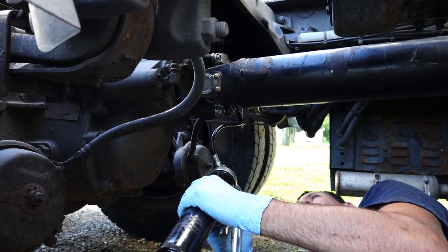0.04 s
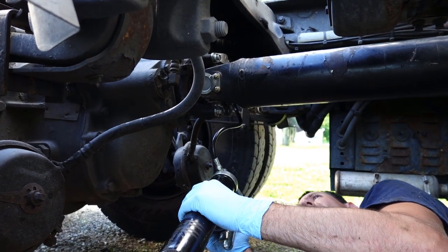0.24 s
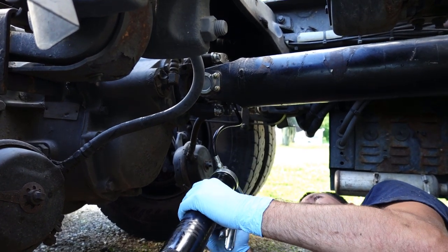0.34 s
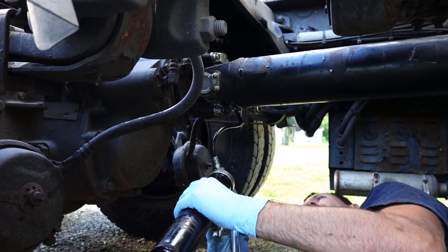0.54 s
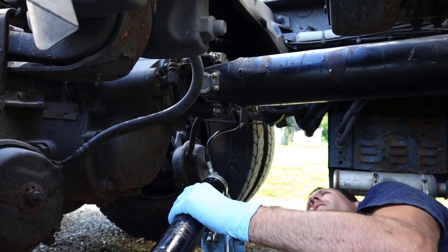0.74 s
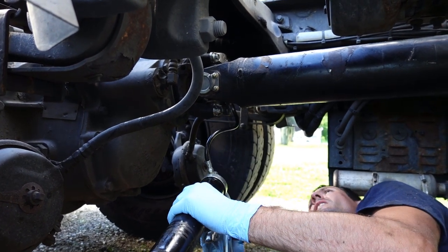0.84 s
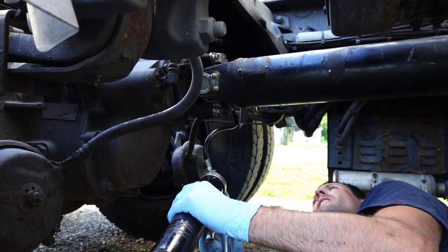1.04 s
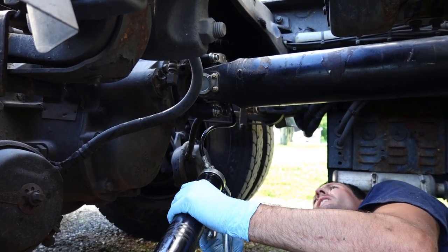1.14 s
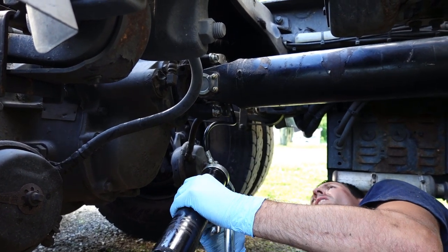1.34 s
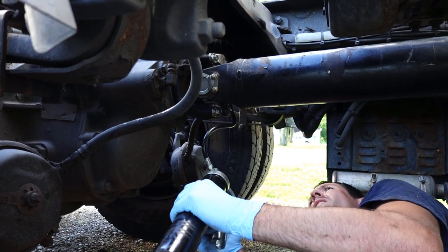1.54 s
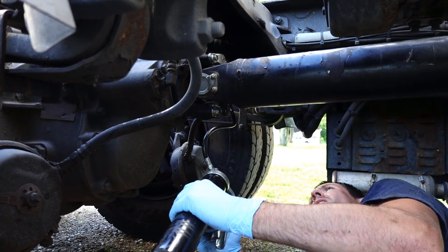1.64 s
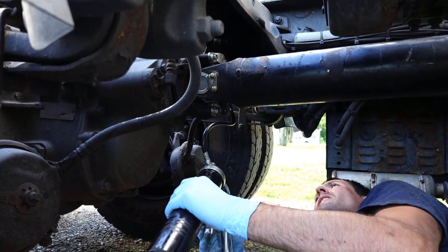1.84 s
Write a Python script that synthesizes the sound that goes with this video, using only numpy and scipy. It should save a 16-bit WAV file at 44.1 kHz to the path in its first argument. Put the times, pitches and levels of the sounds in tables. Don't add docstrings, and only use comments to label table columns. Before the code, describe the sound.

A lever grease gun clacks sharply under a truck, metal chattering and scraping over a low engine drone

```python
import sys
import numpy as np
from scipy import signal
from scipy.fft import rfft, irfft
from scipy.io import wavfile
from scipy.ndimage import uniform_filter1d

SR = 44100
rng = np.random.default_rng(int(sys.argv[2]) if len(sys.argv) > 2 else 0)


def inscribe(sig):
    pcm = np.round(np.clip(np.atleast_2d(sig).T, -1, 1) * 32767)
    wavfile.write(sys.argv[1], SR, pcm.astype(np.int16))


def level_to_linear(level):
    exponent = np.asarray(level, float) / 20
    return 10 ** exponent


N = 83790
T = np.arange(N) / SR


def unit(x):
    return x / np.sqrt(np.mean(x ** 2))


def curve(rows):
    return np.interp(T, *np.array(rows, float).T)


def walk(rate_hz):
    k = int(SR / rate_hz)
    smooth = uniform_filter1d(rng.standard_normal(N), k)
    return unit(uniform_filter1d(smooth, k))


def ring(x, hz, width_hz):
    return signal.lfilter(*signal.iirpeak(hz, hz / width_hz, fs=SR), x)


def shaped(points, flicker_db, rate_hz):
    f = np.fft.rfftfreq(N, 1 / SR) + 1
    p = np.array(points, float)
    colour = level_to_linear(np.interp(np.log(f), np.log(p[:, 0]), p[:, 1]))
    spectrum = rfft(rng.standard_normal(N)) * colour
    octave = np.clip(np.log2(f / 40), 0, 8)
    out = np.zeros(N)
    for k in range(9):
        weight = np.clip(1 - abs(octave - k), 0, 1)
        out += irfft(spectrum * weight, N) * level_to_linear(flicker_db * walk(rate_hz))
    return unit(out)


def echo_tail(t, t60_s):
    return rng.standard_normal(len(t)) * 1000. ** (-t / t60_s)


def add_echo(x, tail, db):
    return x + level_to_linear(db) * signal.fftconvolve(x, tail / np.sqrt(np.sum(tail ** 2)))[:N]


def contact(t, decay_s, rise_s):
    grit_db, crack, crack_s = 1.5, 40., .008
    grit = rng.standard_normal(len(t)) * level_to_linear(grit_db * rng.exponential(size=len(t)))
    push = grit * (1 - np.exp(-t / max(rise_s, 3e-5))) * 1000. ** (-t / max(decay_s, 1e-3))
    push[0] += crack * max(1 - decay_s / crack_s, 0)
    return push


def body(push, modes):
    jitter, scatter_db, damping = .012, 2., .033
    chance = rng.standard_normal((len(modes), 2))
    out = 0
    for (hz, width_hz, db), (shift, lift) in zip(modes, chance):
        mode = ring(push, hz * (1 + jitter * shift), width_hz + damping * hz)
        out = out + level_to_linear(db + scatter_db * lift) * mode
    return out


def strikes(rows, modes, bare_db, spread, order):
    out, t = np.zeros(N + SR), np.arange(SR // 6) / SR
    low_cut_order, high_cut_order = order
    for at, db, hz, decay_s, rise_s in rows:
        push = contact(t, decay_s, rise_s)
        hit = unit(body(push, modes)) + level_to_linear(bare_db) * unit(push)
        low_cut = signal.butter(low_cut_order, hz / spread, "high", fs=SR, output="sos")
        hit = signal.sosfilt(low_cut, hit)
        hit = signal.lfilter(*signal.butter(high_cut_order, min(hz * spread / 2, .4 * SR), fs=SR), hit)
        loudest = np.sqrt(uniform_filter1d(hit ** 2, size=100).max())
        i = int(at * SR)
        out[i:i + len(t)] += hit * level_to_linear(db) / loudest
    return out[:N]


# start in seconds, level in dB, colour in Hz,
# contact decay in seconds, contact rise in seconds.
BARREL_HITS = [(.2663, -41.5, 1280, 0.0062, 0.000048), (.2668, -42, 590, 0.01, 0.00041),
               (.4828, -47, 6000, 0.022, .002), (.4971, -24, 5500, 0.005, .0001),
               (1.5725, -32, 5460, 0.005, .0001), (1.6052, -25, 5000, 0.005, .0001),
               (.498, -26, 3800, 0.028, .0005), (.528, -45, 1270, 0.032, .003),
               (1.5735, -32, 5600, 0.032, 0.00034), (1.6058, -28.5, 7200, 0.021, 0.00046),
               (1.6062, -31.5, 2160, 0.024, 0.00019)]
# frequency in Hz, width in Hz, level in dB.
BARREL_MODES = [(850, 170, -4), (1110, 300, -3), (1840, 220, -1.5), (3182, 150, -19), (4064, 600, 1),
                (5760, 220, 7), (6607, 400, -1), (7500, 600, -14), (10540, 1200, 3.5)]


def barrel_knocks():
    return strikes(BARREL_HITS, BARREL_MODES, bare_db=-1., spread=2.7, order=(1, 2))


# start in seconds, level in dB, colour in Hz,
# contact decay in seconds, contact rise in seconds.
LEVER_HITS = [(.3281, -44, 9000, 0.013, 0.00017), (.5853, -33, 3030, 0.036, 0.00042),
              (.5880, -17, 4517, 0.014, .0002), (.5898, -20, 5500, .007, .0003),
              (.5965, -30, 5000, 0.01, .0005), (.598, -33.5, 6560, 0.03, .0003),
              (.6015, -25, 4460, 0.015, 0.00055), (.606, -33, 4500, .02, 0.00058),
              (.610, -30, 5200, 0.02, .0008), (.6145, -37, 4110, .025, .001),
              (.6205, -41, 6120, 0.021, .0003), (.625, -38.5, 4000, 0.041, .001),
              (.631, -43, 4500, 0.015, .001), (.639, -38, 5000, 0.013, 0.00023),
              (.6497, -42.5, 5320, 0.019, .0004), (.656, -50, 4450, 0.033, 0.0011),
              (.666, -59.5, 4500, 0.025, 0.0023)]
# frequency in Hz, width in Hz, level in dB.
LEVER_MODES = [(2277, 240, 3), (3470, 33, -34), (4016, 19, 2.5), (4200, 52, 14.5), (4320, 33, 9.5),
               (5000, 500, 4.5), (6100, 110, -1.5), (7050, 150, 3.5), (7200, 250, -5), (9000, 160, -17.5)]


def lever_snaps():
    return strikes(LEVER_HITS, LEVER_MODES, bare_db=-8., spread=5.2, order=(2, 1))


# start
# in seconds, level in dB, colour in Hz, # contact decay in seconds, contact rise in seconds.
GRATES = [(.5885, -47, 13000, 0.065, 0.003), (.195, -55.5, 9000, 0.017, 0.0017),
          (.219, -32.5, 7100, 0.025, 0.0024), (.225, -27, 9000, 0.047, 0.00098),
          (.232, -41, 9000, 0.021, 0.0008), (.230, -41.5, 1410, 0.06, 0.0054),
          (.279, -49, 9000, 0.05, 0.0019), (.3576, -30.5, 9000, 0.054, 0.00018),
          (.372, -43.5, 9000, 0.036, .008), (.4339, -35.5, 12700, 0.045, 0.00072),
          (.5272, -33.5, 5800, 0.022, .0005), (.5315, -34.5, 6550, 0.019, 0.0017),
          (.7452, -70, 12040, .01, 0.00029), (1.49, -68, 8023, 0.031, 0.0016),
          (1.5204, -63, 7850, 0.023, .001), (1.6916, -67, 7940, 0.065, 0.00056),
          (1.774, -69, 6900, 0.014, 0.00051), (1.788, -73, 8000, 0.018, 0.00044),
          (1.81, -68, 6750, 0.019, .0005), (1.858, -62, 3520, 0.027, 0.00036)]
# frequency in Hz, width in Hz, level in dB.
COUPLER_MODES = [(1000, 370, 6), (3340, 140, 0.5), (4930, 540, -5), (6930, 360, 4.5), (9200, 200, -19.5),
                 (10120, 150, 6), (13000, 200, 4.5), (14500, 220, 9)]


def coupler_grates():
    return strikes(GRATES, COUPLER_MODES, bare_db=1., spread=2.7, order=(1, 2))


# start in seconds, level in dB, frequency in Hz, T60 in seconds.
PINGS = [
    (0.2205, -36, 3170, 0.05),
    (0.231, -41, 1070, 0.04),
    (.2663, -38, 2025, 0.012),
    (0.3283, -31, 5380, 0.012),
    (.4975, -31, 1960, 0.035),
    (1.5728, -32, 3070, 0.03),
    (1.6056, -22, 950, 0.018),
    (1.607, -29, 1900, 0.035),
    (1.573, -38, 930, 0.035),
]


def pings():
    out = np.zeros(N)
    for at, db, hz, t60_s in PINGS:
        t = np.clip(T - at, 0, None)
        waver = level_to_linear(2.5 * walk(250)) * np.sin(2 * np.pi * hz * t + .8 * walk(150))
        out += level_to_linear(db) * waver * 1000. ** (-t / t60_s) * (1 - np.exp(-t / 0.00013))
    return out


# start in seconds, level in dB, colour in Hz, decay in seconds.
TICKS = [(0.155, -42, 3720, 0.0087), (.195, -52, 6100, .01), (.281, -40, 5600, 0.012),
         (.303, -48, 3900, 0.017), (.3285, -31.5, 7160, 0.018), (0.3326, -36, 5570, 0.021),
         (0.328, -45, 8900, 0.0092), (0.6842, -45, 4440, 0.021), (0.688, -64, 4700, 0.011),
         (0.685, -68, 8200, .012), (.708, -55.5, 4300, 0.013), (.7448, -54.5, 7000, .006),
         (.776, -70, 5250, .01), (0.807, -65, 6970, .006), (.823, -66.5, 6000, .006),
         (0.8345, -56.5, 5280, 0.012), (.835, -67, 7200, 0.0066), (.847, -56, 5610, 0.0052),
         (.866, -65.5, 5500, 0.0067), (0.87, -63, 7500, 0.0049), (.908, -70, 7860, 0.0042),
         (0.919, -71, 5350, 0.0052), (0.9519, -58.5, 5400, 0.008), (.9915, -66, 2570, .006),
         (1.015, -67, 7100, .03), (1.0335, -61.5, 2830, 0.0093), (1.161, -60.5, 7110, .02),
         (1.172, -59, 7500, 0.018), (1.1902, -52, 1680, 0.004), (1.249, -57.5, 3900, .008),
         (1.419, -59, 3570, 0.0086), (1.445, -63, 4500, 0.0077), (1.5203, -54.5, 850, 0.012),
         (1.521, -49.5, 5800, 0.022), (1.522, -56, 3750, .015), (.524, -48.5, 4000, .02),
         (1.601, -40, 6000, 0.033), (1.6015, -41, 990, 0.033), (1.537, -64, 3700, .01),
         (1.667, -64, 12040, .015), (1.717, -61.5, 5000, .008), (1.828, -62, 4300, 0.011),
         (1.87, -56.5, 6580, 0.022), (1.886, -53, 7500, 0.033)]


def ticks():
    q = 2.4
    out, t = np.zeros(N + SR), np.arange(SR // 20) / SR
    for at, db, hz, decay_s in TICKS:
        hit = rng.standard_normal(len(t)) * 1000. ** (-t / max(decay_s, 1e-3))
        hit = ring(ring(hit, hz, hz / q), hz, 2 * hz / q)
        out[int(at * SR):][:len(t)] += hit * level_to_linear(db) / np.abs(hit).max()
    return out[:N]


# time in seconds, level in dB.
SLIDE = [(0, -64.5), (.15, -52.5), (.21, -55.5), (.26, -63), (.42, -65), (.49, -57), (.56, -62),
         (.72, -79.5), (.86, -81.5), (.9, -92.5), (1.1, -75.5), (1.35, -87), (1.45, -70.5), (1.55, -67),
         (1.68, -83.5), (1.83, -75.5), (1.9, -65.5)]
# frequency in Hz, level in dB per Hz.
SLIDE_COLOUR = [(410, -32.5), (700, -5), (946, 2), (1460, -8), (2020, 0.5), (2880, -10), (4100, 2.5),
                (14000, -24), (16000, -35.5)]


def slide():
    squeak = np.zeros(N)
    for hz in [3600, 3950, 4400, 5300]:
        swell = level_to_linear(1.8 * walk(60)) * walk(600)
        wander = 1 + .03 * walk(30) + 0.012 * walk(390)
        squeak += swell * np.sin(2 * np.pi * np.cumsum(hz * wander) / SR)
    level_db = curve(SLIDE)
    squeak_db = -6 + .5 * (level_db + 60)
    hiss = shaped(SLIDE_COLOUR, flicker_db=4.5, rate_hz=13)
    return (hiss + level_to_linear(squeak_db) * unit(squeak)) * level_to_linear(level_db)


# start in seconds, length in seconds, level in dB, start pitch in Hz, end pitch in Hz.
NOTES = [(1.073, 0.034, -79.5, 5120, 4520), (1.159, 0.022, -70, 4307, 4170),
         (1.165, 0.022, -70.5, 3360, 4650), (1.175, 0.031, -67.5, 5730, 5440),
         (1.198, 0.02, -65, 5200, 4010), (1.189, .015, -67, 3900, 3700), (1.221, 0.031, -67.5, 3560, 3730),
         (1.264, 0.061, -71, 3570, 3620), (1.486, 0.036, -74, 2700, 2480), (1.254, 0.015, -62, 3300, 4320),
         (1.264, 0.026, -61, 4280, 4450), (1.285, 0.019, -69, 4400, 3240)]


def bird():
    out = np.zeros(N)
    for at, length_s, db, hz, end_hz in NOTES:
        u = np.clip((T - at) / length_s, 0, 1)
        pitch = (hz + (end_hz - hz) * u) * (1 + .016 * walk(500))
        out += level_to_linear(db) * np.sin(np.pi * u) * np.sin(2 * np.pi * np.cumsum(pitch) / SR)
    out = out * level_to_linear(-4 + 5 * walk(250))
    tail = echo_tail(np.arange(SR // 5) / SR, t60_s=.1)
    return add_echo(out, tail, db=-5)


def hollow(x):
    t = np.arange(SR // 4) / SR
    tail = echo_tail(t, t60_s=0.098) * (t > .002)
    tail = signal.lfilter(*signal.butter(1, 5000, fs=SR), tail)
    return add_echo(x, tail, db=-14.5)


# time in seconds, firing rate in Hz.
DRONE_HZ = [(0, 132.3), (.5, 136.5), (1.0, 139), (1.5, 141), (1.9, 134.6)]
# multiple of the firing rate, level in dB.
DRONE_LINES = [(1.9, -15.5), (2.8, -18), (3.8, -30.5)]


def drone():
    phase = 2 * np.pi * np.cumsum(curve(DRONE_HZ) + 2.5 * walk(32)) / SR
    lines = [(0.98, 0.012)] + list(DRONE_LINES)
    out = np.zeros(N)
    for multiple, db in lines:
        out += level_to_linear(db + 2.5 * walk(15)) * np.sin(multiple * phase)
    return level_to_linear(-66.5) * out


# frequency in Hz, level in dB per Hz.
YARD = [(25, -40.5), (70, -11.5), (141, -6.5), (256, -21), (531, -26.5), (2500, -44), (7000, -43),
        (12000, -49.5), (15000, -71.5)]
# time in seconds, gain in dB.
GAIN = [(0, 18), (.496, 20), (.51, 15.5), (.588, 14), (.62, 10.5), (.75, 4.5), (1.2, 5.5), (1.6, 7),
        (1.64, 4.5), (1.9, 9)]


def yard():
    air = level_to_linear(-67.5) * shaped(YARD, flicker_db=1.5, rate_hz=6.8)
    return (air + drone()) * level_to_linear(curve(GAIN))


def scene():
    gun = barrel_knocks() + lever_snaps() + coupler_grates() + pings() + ticks()
    background = yard()
    return (hollow(gun + bird()) + slide() + background)[None]


def band_limit(x):
    return signal.sosfilt(signal.butter(12, 16820, fs=SR, output="sos"), x)


def record(dry):
    top_cut = signal.ellip(8, .2, 70, 16000, fs=SR, output="sos")
    mix = signal.sosfilt(top_cut, dry)
    return band_limit(mix)


dry = scene()
out = record(dry)
inscribe(out)
```